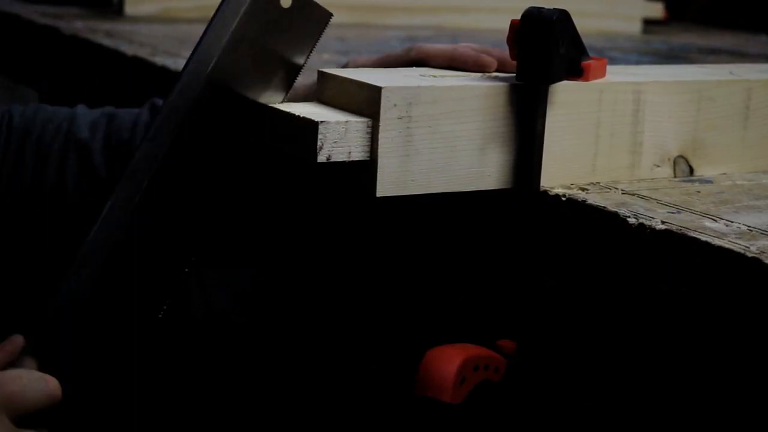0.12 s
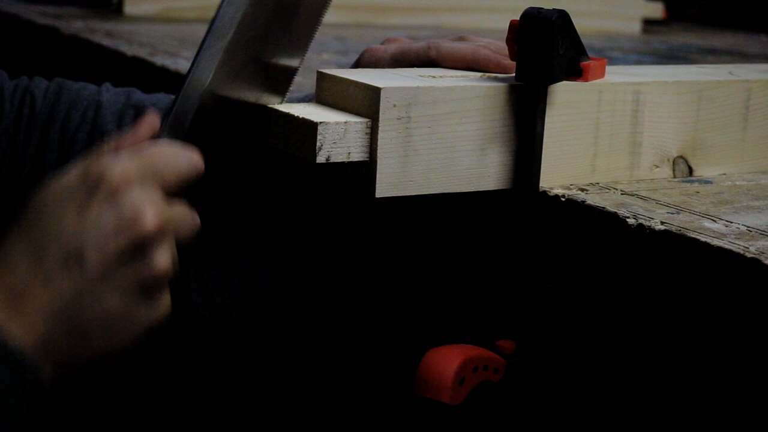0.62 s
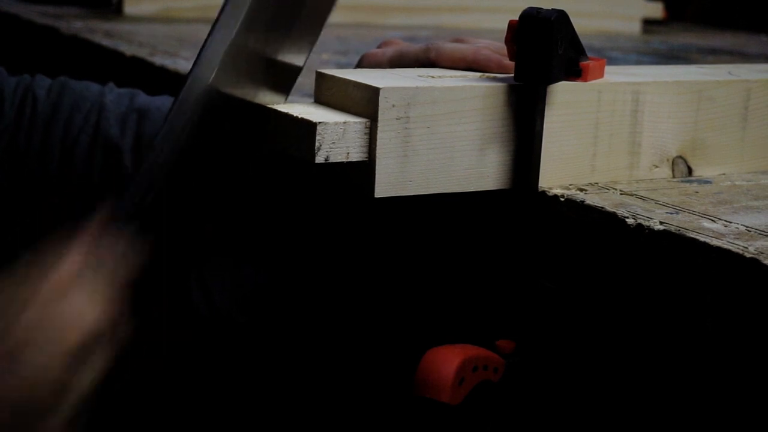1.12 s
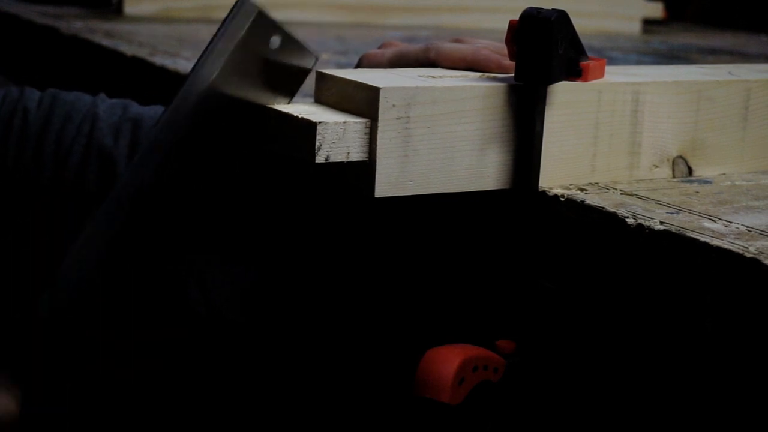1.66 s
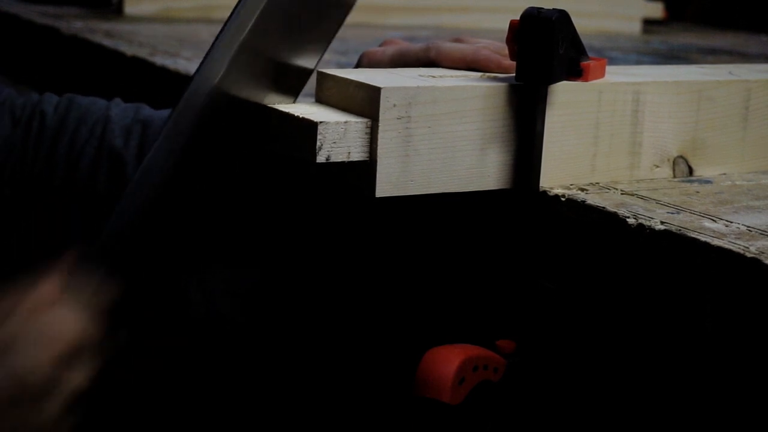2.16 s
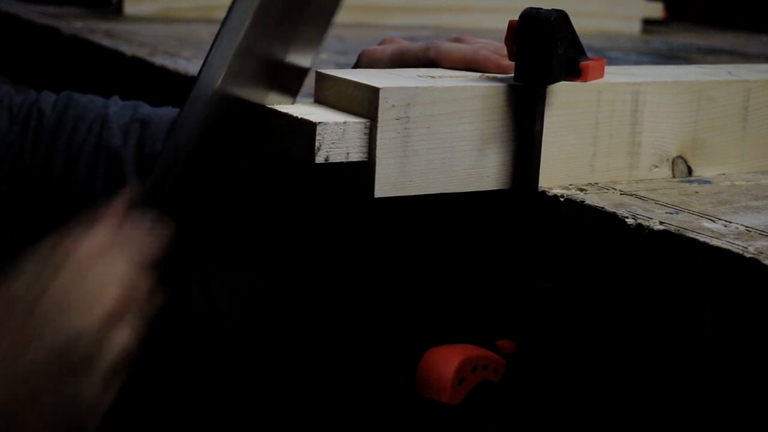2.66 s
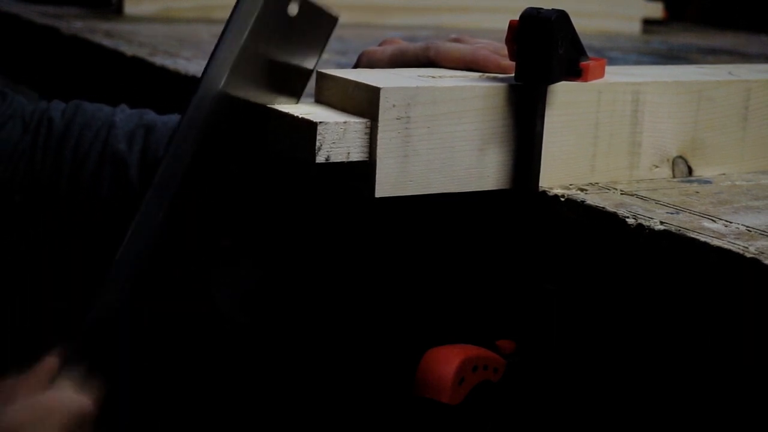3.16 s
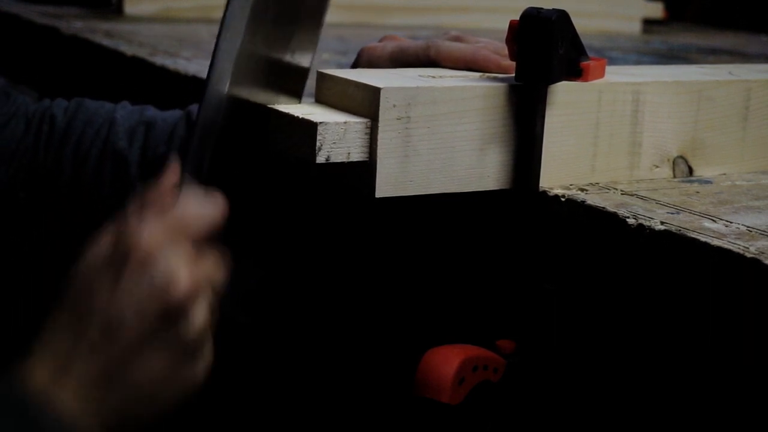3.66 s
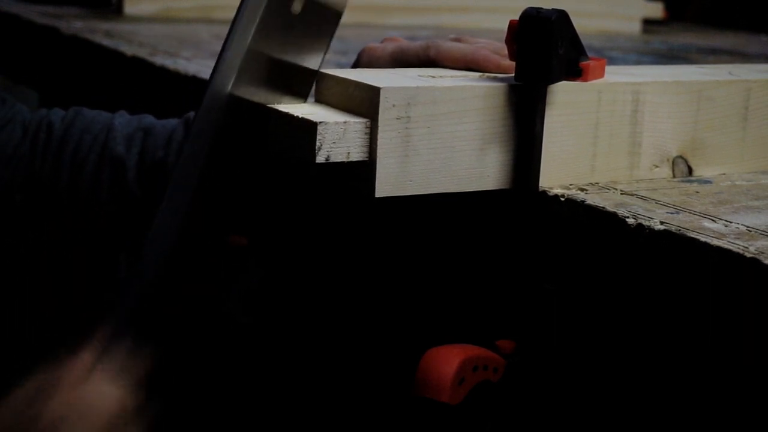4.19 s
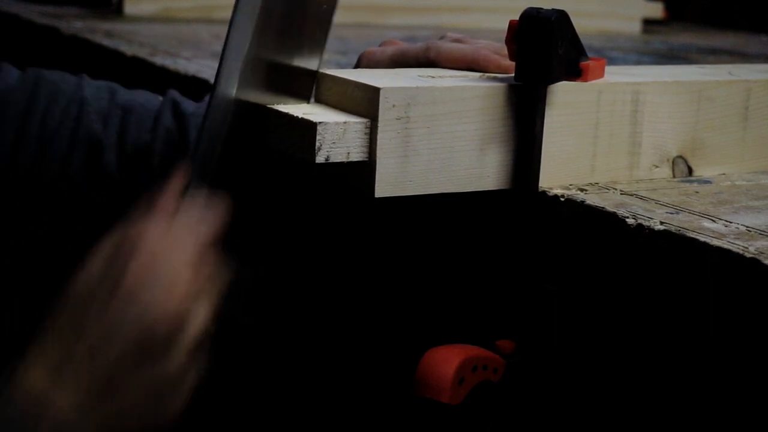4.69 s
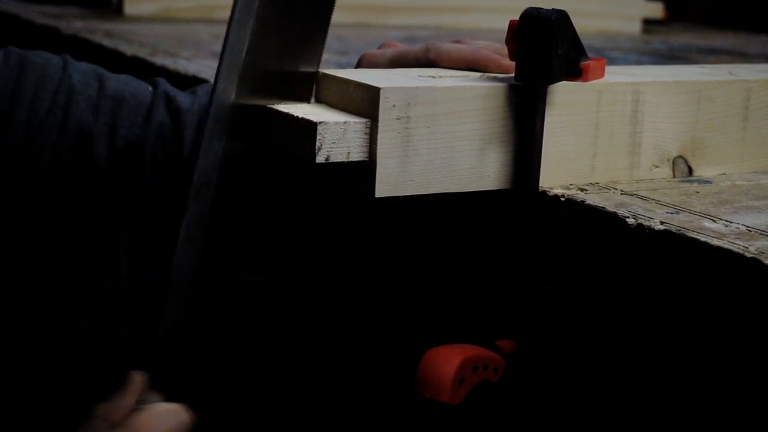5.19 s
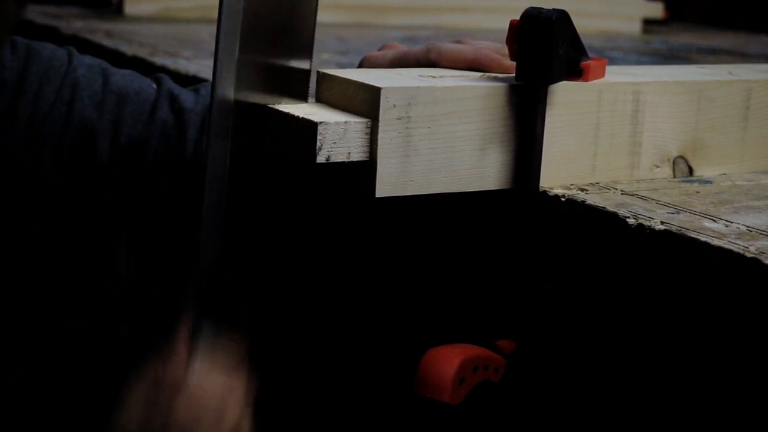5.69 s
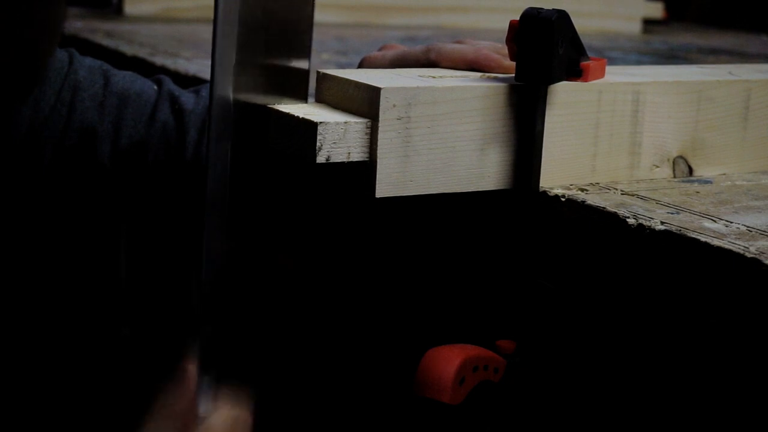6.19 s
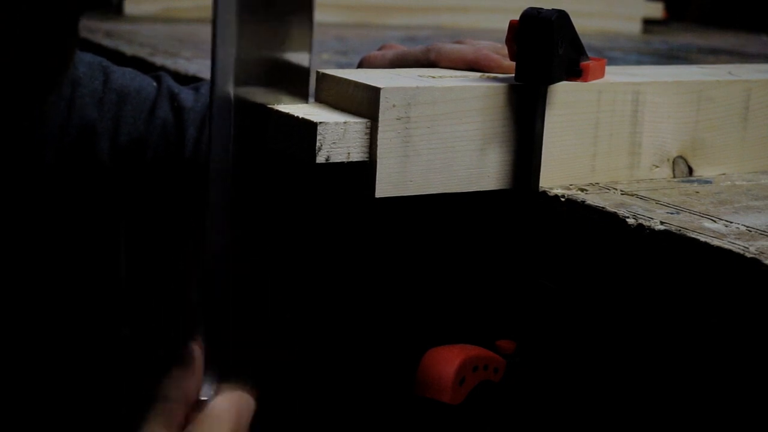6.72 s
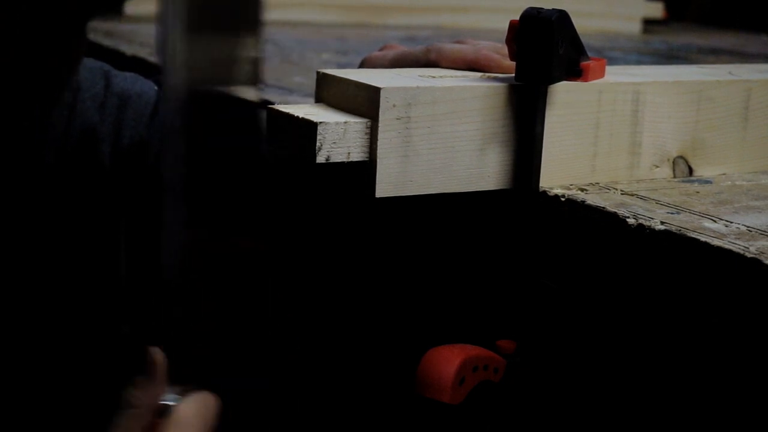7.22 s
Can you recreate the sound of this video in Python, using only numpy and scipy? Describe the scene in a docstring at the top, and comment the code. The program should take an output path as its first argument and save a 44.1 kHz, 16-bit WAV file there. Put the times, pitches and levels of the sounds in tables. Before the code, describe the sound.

In a small workshop, a hand saw goes steadily to and fro through wood, heard from very near and spread wide. Each push gives a grainy, knocking rasp with a nasal wooden tone and thin steel buzz; each pull is lighter. A short near-silent gap follows, with a faint blade catch, then several more strokes, a sharp snap, rattling scrapes and a small metallic ring.

```python
"""A handsaw works to and fro through a small clamped wooden bar, heard close, widened to left and right.
Each tooth knocks wood and bench and shakes the steel blade; the clamp rocks; torn fibres hiss.
The strokes pause after five seconds, the loose blade catches faintly, and sawing resumes.
Near seven seconds the offcut cracks, the blade scrapes out and rings once.
All are resonances driven by uneven forces or filtered noise; a small workshop echoes, its air is faint."""
import sys
import numpy as np
from scipy import signal
from scipy.fft import rfft, irfft, next_fast_len
from scipy.io import wavfile
from scipy.ndimage import uniform_filter1d

SR = 44100
rng = np.random.default_rng(int(sys.argv[2]) if len(sys.argv) > 2 else 0)


def transcribe(signal):
    """Save signal, clipped to [-1, 1], as a 16-bit WAV file at the path in sys.argv[1]."""
    frames = np.atleast_2d(signal).T
    limited = np.clip(frames, -1, 1)
    pcm = np.round(limited * 32767).astype(np.int16)
    wavfile.write(sys.argv[1], SR, pcm)


def invert_db(level):
    """Linear amplitude ratio for a level in decibels (20 dB per decade), elementwise."""
    return 10 ** (np.asarray(level, dtype=float) / 20)


N = 323694
TIME_S = np.arange(N) / SR

# workshop air, relative spectrum: f/Hz, density/dB
AIR = [(24, -57), (40, -9), (442, 4), (509, 2.5), (559, -4), (629, 12), (3950, -9), (4340, -3.5),
       (11100, -17), (14500, -55), (22000, -120)]
AIR_DB = -70  # ahead of the widening
# workshop echo: f/Hz, t60/s
SHOP = [(150, 0.37), (700, 0.38), (3000, 0.49), (10000, 0.046)]

# single contacts of blade and wood, relative levels: t/s, crack/dB, bar knock/dB, blade tap/dB
CONTACTS = [(0.4917, -59, -30.5, -45), (.527, -60, -25, -44), (0.9795, -61, -17.5, -46),
            (1.3614, -59.5, -25, -46), (1.398, -60, -21, -46), (2.212, -61.5, -23, -46),
            (3.2475, -50, -26, -38), (3.5834, -58.5, -25.5, -36), (4.2423, -52.5, -32, -38),
            (4.6, -60, -24, -46), (4.692, -62, -24.5, -47), (5.678, -73, -53.5, -79),
            (5.746, -60.5, -32, -48), (6.2714, -52, -33, -44), (6.3, -60, -30, -48),
            (6.462, -58.5, -28, -46), (6.817, -55, -31, -44), (6.918, -25, -62, -27),
            (6.923, -17.5, -34, -28), (6.934, -21.5, -36, -38), (6.9395, -34, -29.5, -42),
            (6.996, -40, -33.5, -31), (7.002, -52, -34, -40), (7.0075, -40.5, -53, -26),
            (7.0476, -45, -31, -28), (7.0596, -48, -33, -29), (7.074, -47, -30, -31),
            (7.0864, -43, -31.5, -33), (7.1, -51.5, -41, -37), (7.118, -55, -37, -44),
            (7.2225, -57, -44.5, -44.5)]
FREED_S = 7.2  # from here the blade is out of the cut
THUD_DB = -9.5  # bench under bar in a single contact

# bar resonances: f/Hz, width/Hz, slanted level/dB, upright level/dB
WOOD = [(487.7, 51, -4.5, -14.5), (543.4, 35, 2, 2), (585, 41.2, 4.5, 0), (615.6, 41, 3.5, 0.5),
        (713, 34, 1.5, 1.5), (779, 78, 1, -0.5), (830, 51.5, 1, 0.5), (1016, 82, -6, -10),
        (1220, 26.3, -2, -2.5), (1349, 41, -8, -11), (1565, 127, -9, -4), (1515, 1270, -19.5, -12.5)]
# bench-top resonances: f/Hz, width/Hz, slanted level/dB, upright level/dB
BENCH = [(183.7, 24, -2, -11.5), (223.6, 8.8, -1, -1.5), (253, 37, -7.5, -2), (351, 42, 1.5, -7.5),
         (411, 23.2, 2.5, -5)]
# blade modes: f/Hz, width in the cut/Hz, held level/dB, free t60/s, free level/dB
BLADE = [(1250, 69, -14, 0.28, 3.5), (2075, 45, 1, 0.067, 12.5), (2360, 150, -14.5, 0.2, -10),
         (2447, 81, 3, 0.07, -12), (2450, 790, -7, 0.017, -9), (2780, 41, 0, 0.77, -7.5),
         (2958, 53, -5, 0.1, -14), (3112, 44, -2, 0.099, -11), (3183, 73, -0.5, 3, -4),
         (3292, 46, -5.5, .08, -14), (3380, 43, -1, 0.067, -14.5), (3454, 38, -1.5, .08, -14.5),
         (3543, 65, -5, 0.086, -15.5), (3329, 987, -6, 0.022, -14), (3936, 160, -10, .2, -17.5),
         (4100, 33, -6.5, 0.15, -15), (4545, 230, -9.5, .08, -14)]
# thin upper modes that colour the hiss: f/Hz, width/Hz, level/dB
EDGE = [(4930, 270, -6.5), (5570, 78, 4), (5970, 58, -7), (6710, 66, 4), (7050, 25, -1.5), (8000, 96, -4),
        (8380, 81, -8), (9250, 120, -4)]
# tearing fibres, relative spectra: f/Hz, shallow density/dB, deep density/dB
FIBRES = [(1210, -2, 0), (2500, -4, -5.5), (3500, 1, -6), (4610, -4.5, -4.5), (6460, -7, -4.5),
          (8500, -9.5, -8.5), (11200, -13, -15.5)]
CLAMP_HZ, CLAMP_WIDTH_HZ = 143, 9.8
# clamp rocking on push and pull, relative to the wood force: t/s, level/dB
ROCK = [(0, -16.5), (1.5, -14.5), (2.5, -20.5), (4.5, -26.5), (5.2, -18), (6, -19), (6.6, -19.5),
        (7.34, -9)]

# cutting strokes, teeth digging in: t/s, length/s, pressure/dB, hiss/dB, bite point/share of stroke
CUTS = [(0.476, 0.26, -28.5, -35.5, 0.18), (0.929, 0.22, -28, -39, 0.21), (1.341, 0.19, -25.5, -43, 0.25),
        (1.742, 0.21, -27.5, -40, 0.26), (2.125, 0.21, -25, -42, 0.36), (2.506, 0.17, -25, -40, 0.52),
        (2.871, 0.17, -24.5, -43, 0.17), (3.218, 0.16, -21, -41.5, 0.15), (3.57, 0.17, -22, -40, 0.21),
        (3.898, 0.17, -24, -38, 0.25), (4.227, 0.17, -23, -38, 0.34), (4.571, 0.17, -21, -36.5, 0.17),
        (4.922, 0.18, -23.5, -38.5, 0.29), (5.739, 0.13, -31.5, -44.5, 0.086),
        (6.239, 0.17, -25, -42.5, 0.34), (6.554, 0.16, -24.5, -40, 0.36)]
# return strokes, teeth sliding back: t/s, length/s, pressure/dB, hiss/dB, bite point/share of stroke
RETURNS = [(-0.11, 0.19, -32, -43.5, 0.58), (0.349, 0.096, -42.5, -64.5, 0.4),
           (0.731, 0.17, -29, -39, 0.35), (1.154, 0.17, -30, -44.5, 0.17), (1.551, 0.18, -30, -43.5, 0.56),
           (1.942, 0.16, -28, -42, 0.42), (2.347, 0.15, -28, -46.5, 0.4), (2.705, 0.17, -30.5, -43.5, 0.56),
           (3.064, 0.15, -28, -48, 0.47), (3.395, 0.17, -31, -45, 0.41), (3.743, 0.15, -28.5, -45, 0.26),
           (4.065, 0.15, -30, -44, 0.31), (4.407, 0.165, -27, -41.5, 0.46), (4.756, 0.16, -25, -37, 0.42),
           (5.122, 0.14, -34, -44, 0.33), (6.095, 0.14, -35.5, -52, 0.36), (6.415, 0.14, -31, -45.5, 0.3),
           (6.715, 0.14, -32, -44, 0.3)]
# loose blade catching and scraping: t/s, length/s, pressure/dB, hiss/dB, bite point/share of stroke
SCRAPES = [(5.674, 0.059, -52, -87, 0.1), (5.987, 0.071, -57, -72, 0.31), (6.918, 0.049, -40, -47, 0.31),
           (6.994, 0.038, -35, -52, 0.12), (7.041, 0.075, -33, -50, 0.069), (7.221, 0.042, -48, -64, 0.16)]
# course of a stroke per part, relative to full strength: start level/dB, lag of full strength/share,
# letting go/share, level there/dB, end level/dB
CUT_COURSE = dict(pressure=(-13.5, -0.16, 1.5, -5, -19), jolt=(-14, 0.14, 0.21, -8.5, -13.5),
              speed=(-15, 0.18, 0.7135, -0.36, -15), shake=(-15, 0.31, 0.6, 0, -14.5))
RETURN_COURSE = dict(pressure=(-20, -2, 2.1, -1.5, -7), jolt=(-5.5, -0.5, 1.46, -6, -3.5),
                 speed=(-13, 0.26, 0.9, -0.04, -14), shake=(-13.5, 0.3, 0.76, -3.5, -12.5))
SCRAPE_COURSE = dict(pressure=(-24, -7, 0.5, -3, -14), jolt=(-2, -0.5, 1.3, -3, -8),
                 speed=(-6, -0.15, 0.92, -4, -14), shake=(-4, -3, 3.5, -11.5, -15))
# part level over its source: cut/dB, return/dB, scrape/dB
OVER_DB = dict(pressure=(1.36, 0, -1), jolt=(-14.5, -27, -15), speed=(0.8, 0.25, 1.5), shake=(2.5, 5, -4.5))
# source of each part: 0 pressure to 1 hiss/share
HISS_SHARE = dict(pressure=0, jolt=0, speed=1, shake=.5)
# how far the bite point times each part/share
BITE_SETS = dict(pressure=0.98, jolt=0.79, speed=.3, shake=0.32)
ONSET_DB_PER_S = 800.5  # before the start
# fall of each part after the end: slope/(dB/s)
FADE_DB_PER_S = dict(pressure=162.5, jolt=147, speed=210, shake=187)
FROM_REST_DB, CREEP_S = -24, .028  # a return after a pause creeps in early, from far down
LIFT_DB = 16  # once a stroke has let go this far, the teeth leave the wood
TOP_TEETH_PER_S, SLOWEST_TEETH_PER_S = 225, 120  # ahead of jitter

# turn of the saw from slanted to upright: t/s, turn/share
UPRIGHT = [(0, 0.32), (1, 0.22), (2, 0.3), (3, 0.15), (4, 1), (4.8, 0.57), (5.3, 0.78), (6, 0.65),
           (7.34, 0.68)]
# depth of the blade in the wood: t/s, depth/share
DEPTH = [(0, 0.15), (.6, 0.15), (1.1, 0), (1.8, 0.21), (3, .1), (3.6, 0.09), (4, 0.1), (4.4, 0.33),
         (4.7, 0.73), (5.2, 0.88), (5.8, 0.88), (6.4, 1), (6.9, 0.87), (7.34, 0.5)]
# slow change of the bench thump, relative: t/s, level/dB
THUMP = [(0, 3.5), (.6, 3.5), (1, 4.5), (1.4, 3), (2.2, 3), (2.8, 2.5), (3.5, 0.5), (4.3, 1.5), (4.8, -0.5),
         (5.8, 1), (6.6, -0.5), (7.34, -5)]
# teeth pressing into the bar, in groups of strokes: t/s, pressure/dB, favoured bar pitch f/Hz
PRESS = [
    [(0.0, -35.5, 650), (0.048, -33.5, 646), (0.078, -47, 660), (0.144, -48, 674), (0.234, -76, 650),
     (0.32, -68, 650), (0.358, -50, 677), (0.402, -46.5, 610), (0.44, -55, 638), (0.484, -34, 640),
     (0.526, -22.5, 684), (0.586, -31.5, 674), (0.612, -30, 665), (0.724, -45, 653), (0.746, -37.5, 624),
     (0.768, -40, 652), (0.816, -29, 650), (0.832, -39, 663), (0.862, -32.5, 637), (0.928, -41, 650),
     (0.988, -23, 642.2), (1.022, -32.5, 642), (1.086, -31.5, 658), (1.1, -30, 630), (1.152, -41.5, 630),
     (1.19, -31.5, 683.5), (1.234, -35.5, 716), (1.264, -34, 702), (1.34, -45, 640)],
    [(1.34, -46, 656.2), (1.366, -27.5, 626.3), (1.404, -22, 608), (1.436, -35, 670), (1.466, -30, 755),
     (1.546, -45, 620), (1.57, -34.5, 638), (1.642, -41, 665), (1.67, -29, 627), (1.704, -29, 627),
     (1.716, -41, 624), (1.762, -34.5, 690), (1.812, -24.5, 597), (1.85, -32, 621), (1.882, -26.5, 676),
     (1.946, -40, 690), (2.024, -31, 691), (2.096, -34.5, 684), (2.124, -42, 642), (2.166, -30, 650),
     (2.216, -25, 658.8), (2.23, -29, 634), (2.28, -26.5, 595.2), (2.326, -42, 637), (2.376, -34, 605.8),
     (2.408, -25, 622.3), (2.512, -38.5, 616), (2.542, -28.5, 671.4), (2.6, -24.5, 680), (2.63, -22, 637),
     (2.666, -37, 639), (2.72, -42, 657.3)],
    [(2.72, -39, 687.5), (2.76, -39, 716), (2.816, -27.5, 670), (2.836, -39, 671.4), (2.866, -36.5, 656.7),
     (2.908, -21, 675.5), (2.938, -27.5, 723.4), (2.974, -23, 711.4), (3.004, -29.5, 628),
     (3.062, -40, 651.6), (3.148, -28.5, 730), (3.182, -36, 686), (3.192, -32.5, 691), (3.22, -38, 639),
     (3.246, -25, 615), (3.294, -27.5, 726), (3.31, -22, 726), (3.34, -24, 658.7), (3.378, -38, 656.4),
     (3.438, -36, 728), (3.472, -29.5, 746), (3.508, -32.5, 751), (3.568, -40, 645), (3.584, -24.5, 660),
     (3.636, -24.5, 622), (3.652, -30, 669), (3.686, -28, 660), (3.73, -34, 669.5), (3.814, -28, 718.2),
     (3.904, -38, 629), (3.922, -25.5, 614.8), (3.968, -28, 619), (4.006, -26.5, 685.7),
     (4.07, -36.5, 654.7)],
    [(4.07, -34.5, 708), (4.154, -33, 696), (4.21, -45, 682.2), (4.256, -29, 633), (4.274, -35.5, 673.5),
     (4.294, -25, 709.3), (4.334, -25.5, 710), (4.398, -39, 678.4), (4.422, -37, 664.2),
     (4.452, -38, 736.3), (4.486, -28, 740), (4.526, -28, 637), (4.55, -24.5, 647.3), (4.568, -35, 642),
     (4.584, -26, 670), (4.624, -22.5, 682.6), (4.662, -35, 659.5), (4.692, -21, 632.2), (4.75, -35, 665),
     (4.764, -29.5, 706), (4.832, -27, 730), (4.922, -40, 657.5), (4.942, -27.5, 685.7),
     (4.964, -33, 655.4), (4.986, -27, 617.5), (5.07, -35, 679.6), (5.104, -41, 688), (5.148, -40.5, 656),
     (5.212, -39, 720.6), (5.378, -57.5, 705.3), (5.398, -76, 678), (5.6, -75.5, 704.5)],
    [(5.6, -73, 746.6), (5.666, -75.5, 715), (5.686, -56, 676), (5.72, -72, 612.6), (5.74, -35, 627.7),
     (5.75, -31, 630), (5.818, -34, 636.3), (5.962, -60, 631.7), (5.986, -76, 638), (6.03, -58, 594.6),
     (6.078, -73, 624.4), (6.098, -53, 709.3), (6.146, -36, 690), (6.21, -36.5, 675), (6.244, -44.5, 674.4),
     (6.306, -24.5, 697), (6.432, -41, 692.6), (6.462, -32.5, 689.3), (6.516, -30, 641),
     (6.554, -39, 654.7), (6.574, -31.5, 680), (6.674, -28.5, 618), (6.694, -37, 618.3),
     (6.728, -39, 686.7), (6.772, -29.5, 649), (6.816, -31, 677.8), (6.898, -50, 714.8),
     (6.942, -27.5, 700), (6.98, -50, 690), (7.01, -38, 750), (7.034, -41, 700), (7.058, -35.5, 717.3),
     (7.208, -60, 624.6), (7.238, -49, 630), (7.3, -76, 695), (7.34, -76, 693)],
]
# favoured upper blade pitch as the free length changes: t/s, f/Hz, boost/dB
SING = [(0.0, 3370, 6), (0.16, 3340, 6), (0.2, 3270, 3), (0.72, 3250, 7.5), (0.78, 3380, 6),
        (1.14, 3250, 4.5), (1.2, 3434, 5.5), (1.28, 3259, 5.5), (3.09, 3270, 5), (3.17, 3421, 3.5),
        (3.27, 3217, 5), (3.55, 3433, 5.5), (3.59, 3209, 6), (3.73, 3202, 5), (3.77, 3359, 5.5),
        (4.05, 3181, 7.5), (4.13, 3330, 5.5), (4.39, 3120, 9), (4.45, 3260, 6.5), (4.55, 3100, 6),
        (5.69, 3290, 4), (5.92, 3053, 3), (6.08, 3397, 6), (6.15, 3132, 1), (7.16, 3280, 6), (7.2, 3170, 4)]
# favoured blade pitch over that of its depth, by cut, return, scrape: early ratio/1, late ratio/1
BLADE_GLIDE = [(0.97, 0.938), (1.02, 1.028), (1.1, 1.01)]
# shallow, deep: low blade modes, high blade modes, favoured blade pitch
LOW_DB, HIGH_DB, BLADE_HZ = (-4, 0.5), (-1, -11), (3323, 2360)
SPLIT_HZ = 2950  # low from high blade modes
# upper bar modes follow the shaking more than the pressure
UPPER_HZ, UPPER_FOLLOWS, UPPER_DB = 930, 0.66, 3.5

# widening, phase of left ahead of right: f/Hz, lead/rad
LEAD = [(60, .6), (125, .95), (200, 1.15), (340, 1.55), (600, 1.76), (1100, 1.82), (2800, 1.5), (5000, 1.2),
        (10900, .7)]
# widening, left over right: f/Hz, level/dB
SIDES = [(60, 53), (140, -0.5), (340, -1), (800, -1.5), (1900, -3), (4500, -6), (10700, -7.5)]
# spread sound, opposite in left and right: f/Hz, level/dB
APART = [(40, 0), (120, -18), (600, -24), (1500, -21), (3000, -17), (6000, -10), (10000, -4)]


def unit(x):
    """Scaled to rms 1."""
    return x / np.sqrt(np.mean(x ** 2) + 1e-20)


def along(points, hz):
    """(f/Hz, value) points read on a log frequency axis."""
    f, v = np.transpose(points)
    return np.interp(np.log(hz + 1), np.log(f + 1), v)


def filtered(x, response):
    """x times a complex response of frequency."""
    m = next_fast_len(N + SR // 2)
    return irfft(rfft(x, m) * response(np.fft.rfftfreq(m, 1 / SR)), m)[..., :N]


def controls(rows):
    """One value per sample for each column after the time."""
    s, *columns = np.transpose(rows)
    return [np.interp(TIME_S, s, c) for c in columns]


def wobble(knots_per_s):
    """A random curve, straight between normal knots."""
    knots = rng.standard_normal(int(N * knots_per_s / SR) + 2)
    return np.interp(np.arange(N) * knots_per_s / SR, np.arange(len(knots)), knots)


def blend(ends, share):
    """From the first of two values to the second."""
    first, second = ends
    return first + share * (second - first)


def mode(force, hz, width_hz):
    """One resonance driven by a force, gain 1 at its peak."""
    r = np.exp(-np.pi * width_hz / SR)
    return signal.lfilter([1 - r, 0, r - 1], [1, -2 * r * np.cos(2 * np.pi * hz / SR), r * r], force)


def body(force, modes, wander_db=0):
    """Sum of resonances; the point of contact slides, so each one waxes and wanes by itself."""
    total = 0
    for k, (hz, width_hz, db) in enumerate(modes):
        total = total + (-1) ** k * mode(force * invert_db(db + wander_db * wobble(9)), hz, width_hz)
    return total


def favour(hz, centre_hz, boost_db, spread):
    """Extra dB for a mode close to the favoured pitch."""
    return boost_db * np.exp(-(np.log(hz / centre_hz) / spread) ** 2)


def soft(force, seconds):
    """Wood gives way, so a blow lasts a moment."""
    size = max(int(seconds * SR), 1)
    return size ** .5 * uniform_filter1d(uniform_filter1d(force, size), size)


def air():
    """Quiet workshop air: shaped noise, independent in the two channels."""
    noise = rng.standard_normal((2, N))
    return invert_db(AIR_DB) * unit(filtered(noise, lambda f: invert_db(along(AIR, f))))


def shop(x):
    """Each frequency of the room's answer dies at its own speed."""
    hz, t, z = signal.stft(rng.standard_normal(SR // 2), SR, nperseg=256)
    decay = invert_db(-60 * t / along(SHOP, hz)[:, None])
    tail = signal.istft(z * decay, SR, nperseg=256)[1]
    late = np.pad(x, (400, 0))  # samples
    return signal.fftconvolve(late, tail / np.linalg.norm(tail))[:N]


def contacts():
    """A crack of a few ms, a knock in bar and bench, a tap on the blade, damped by the cut until free."""
    cracks, knocks, taps = np.zeros(N + SR), np.zeros(N), np.zeros(N)
    t = np.arange(SR // 10) / SR
    burst = invert_db(-60 * t / .022) * (1 - np.exp(-t / .0006))
    for s, crack_db, knock_db, tap_db in CONTACTS:
        i = round(s * SR)
        cracks[i:][:len(t)] += invert_db(crack_db - 2.5) * burst * rng.standard_normal(len(t))
        knocks[i] = invert_db(knock_db + 35)
        taps[i] = invert_db(tap_db + 20)
    cracks = filtered(cracks[:N], lambda f: 1j * f / (2500 + 1j * f))

    bar = [(hz, w, upright_db) for hz, w, _, upright_db in WOOD]
    bench_top = [(hz, w, slanted_db + THUD_DB) for hz, w, slanted_db, _ in BENCH]
    knocks = body(soft(knocks, .00037), bar + bench_top)

    taps = soft(taps, .0001)
    free = TIME_S > FREED_S
    held = body(taps * ~free, [m[:3] for m in BLADE])
    ring = 0
    for hz, _, _, t60_s, db in BLADE:
        width_hz = np.log(1000) / (np.pi * t60_s)
        ring = ring + invert_db(db + 36) * t60_s * mode(taps * free, hz, width_hz)
    return cracks + knocks + held + ring


def effort(part, scaled=True):
    """One part of the hand's effort in dB: every stroke rises, holds and lets go; the strongest counts."""
    t, level_db = np.arange(0, N + 64, 64) / SR, -200
    ends_s = np.array([s + length for s, length, *_ in CUTS + RETURNS])
    courses = (CUT_COURSE, RETURN_COURSE, SCRAPE_COURSE)
    for rows, course, over_db in zip((CUTS, RETURNS, SCRAPES), courses, OVER_DB[part]):
        turn_db, lag, go, go_db, last_db = course[part]
        for s, length, pressure_db, hiss_db, bite in rows:
            first_db, start = turn_db, s
            full = np.clip(BITE_SETS[part] * bite + lag, .02, .9)
            if rows is RETURNS and np.abs(ends_s - s).min() > .04:  # from rest
                first_db, start, full = FROM_REST_DB, s - CREEP_S, max(full, bite)
            end = s + length
            times = [start - 1, start, s + full * length, s + max(go, full) * length, end, end + 1]
            dbs = [first_db - ONSET_DB_PER_S, first_db, 0, go_db, last_db, last_db - FADE_DB_PER_S[part]]
            top_db = blend((pressure_db, hiss_db), HISS_SHARE[part]) + over_db
            level_db = np.maximum(level_db, scaled * top_db + np.interp(t, times, dbs))
    return np.interp(TIME_S, t, level_db)


def glide(pairs, waver_db):
    """A favoured pitch slides along each stroke and wavers."""
    points = []
    for rows, pair in zip((CUTS, RETURNS, SCRAPES), pairs):
        for s, length, *_ in rows:
            points += [(s + share * length, ratio) for share, ratio in zip((.25, .75), pair)]
    return controls(sorted(points))[0] * invert_db(waver_db * wobble(18))


def teeth(teeth_per_s, jitter_db, scatter_db, rough):
    """One uneven bite per passing tooth, mixed with rubbing noise that swells once a tooth."""
    turns = np.cumsum(teeth_per_s * invert_db(jitter_db * wobble(120))) / SR
    bites = np.diff(np.floor(turns), prepend=0) * invert_db(scatter_db * rng.standard_normal(N))
    rub = (1 - turns % 1) ** 0.55 * rng.standard_normal(N)
    return np.sqrt(1 - rough) * unit(bites) + np.sqrt(rough) * unit(rub)


def turned(modes):
    """Mode levels follow the saw's turn from slanted to upright."""
    [up] = controls(UPRIGHT)
    return [(hz, w, blend((slanted, upright), up)) for hz, w, slanted, upright in modes]


def clamp(wood_db):
    """Noise under the wood force rocks the clamp at one low resonance."""
    [rock_db] = controls(ROCK)
    return mode(rng.standard_normal(N) * invert_db(wood_db + 31.5 + rock_db), CLAMP_HZ, CLAMP_WIDTH_HZ)


def bench(bite, grip):
    """Softened bites jolt the bench top."""
    [thump_db] = controls(THUMP)
    force = soft(bite, .0004) * invert_db(effort("jolt") + thump_db + 12 + 1.1 * grip)
    return body(force, turned(BENCH), wander_db=1.6)


def tearing(chatter, deep):
    """Fibres hiss as noise plus tooth chatter, their spectrum set by depth; thin upper modes colour it."""
    source = invert_db(0.85 * wobble(300)) * rng.standard_normal(N) + 0.32 * chatter
    spectra = [[(m[0], m[k]) for m in FIBRES] for k in (1, 2)]
    shallow, buried = filtered(source, lambda f: invert_db([along(points, f) for points in spectra]))
    hiss = unit(blend((shallow, buried), deep)) * invert_db(effort("speed") + 1 + 0.61 * wobble(30))
    return hiss + body(hiss, EDGE, wander_db=3)


def blade(chatter, grip, deep, shake_db):
    """Tooth chatter rings the held steel; depth and contact set the modes that stand out."""
    blade_hz = blend(BLADE_HZ, deep) * glide(BLADE_GLIDE, waver_db=0.57)
    sing_hz, sing_db = controls(SING)
    steel = []
    for hz, w, db, *_ in BLADE:
        depth_db = blend(LOW_DB if hz < SPLIT_HZ else HIGH_DB, deep)
        contact_db = favour(hz, blade_hz, 3, spread=.03) + favour(hz, sing_hz, sing_db, spread=.02)
        steel.append((hz, w, shake_db + depth_db + db + contact_db))
    return body(chatter * invert_db(12 + 1.1 * grip), steel, wander_db=2.8)


def wood(bite, grip, wood_db, bar_hz, shake_db):
    """Each bite knocks the bar; the shaped force drives it, so it rings on."""
    upper_db = UPPER_FOLLOWS * (shake_db - wood_db) + UPPER_DB
    bar = []
    for hz, w, db in turned(WOOD):
        follow_db = upper_db if hz > UPPER_HZ else 0
        bar.append((hz, w, db - 4.5 + follow_db + favour(hz, bar_hz, 6, spread=.093)))
    return body(bite * invert_db(wood_db + 15.5 + grip), bar, wander_db=2)


def saw():
    """The teeth drive bar, bench, clamp and blade; the tooth rate rises and falls within each stroke."""
    wood_db, bar_hz = controls(np.vstack(PRESS))
    wood_db = wood_db + np.minimum(effort("pressure", scaled=False) + LIFT_DB, 0)
    shake_db = effort("shake")
    [deep] = controls(DEPTH)
    teeth_per_s = TOP_TEETH_PER_S * invert_db(.3 * effort("speed", scaled=False))
    teeth_per_s = np.maximum(teeth_per_s, SLOWEST_TEETH_PER_S)
    bite = soft(teeth(teeth_per_s, jitter_db=1, scatter_db=3.5, rough=.33), .00012)
    chatter = teeth(teeth_per_s, jitter_db=2, scatter_db=4, rough=.55)
    grip = wobble(45)  # the cut binds and frees the blade
    low = clamp(wood_db) + bench(bite, grip)
    high = tearing(chatter, deep) + blade(chatter, grip, deep, shake_db)
    return low + high + wood(bite, grip, wood_db, bar_hz, shake_db)


def scene():
    """Channel 0: the mono sound; channel 1: the sound to spread to the sides, mostly echo."""
    work = saw() + contacts()
    mono = work + invert_db(-14) * shop(work)
    spread = shop(work) + 0.13 * work
    return np.array([mono, spread]) + air()


def roll_off(x):
    """The treble ends steeply here."""
    return signal.sosfilt(signal.butter(12, 11270, fs=SR, output="sos"), x)


def record(dry):
    """A mono sound widened to left and right by phase and level; bass cut, nothing above 11150 Hz."""
    sign = np.array([[1], [-1]])  # left, right

    def response(f):
        bass_cut = invert_db(-48.5) + (1j * f / (122 + 1j * f)) ** 3
        level = invert_db(3.5 + along(SIDES, np.maximum(f, 140)) / 2 * sign)  # level steady below 140 Hz
        phase = np.exp(.5j * along(LEAD, f) * sign)
        return bass_cut * level * phase * (f < 11150)

    apart = filtered(dry[1], lambda f: invert_db(along(APART, f)))
    pair = filtered(dry[0] + apart * sign, response)
    return roll_off(pair)


dry = scene()
out = record(dry)
transcribe(out)
```